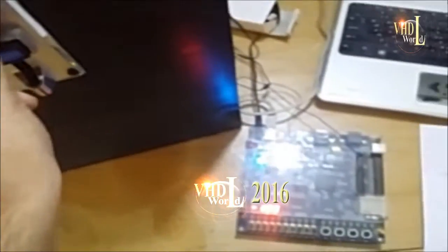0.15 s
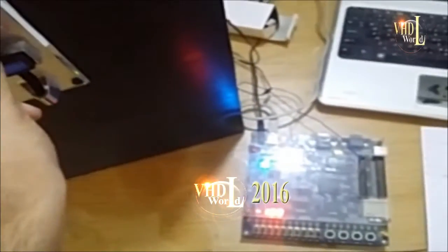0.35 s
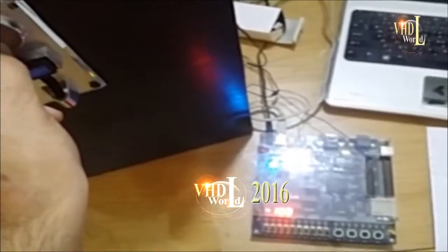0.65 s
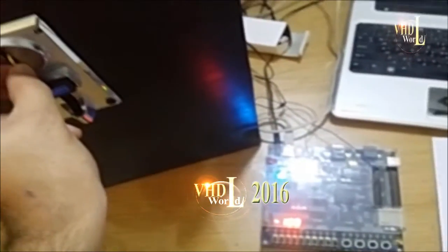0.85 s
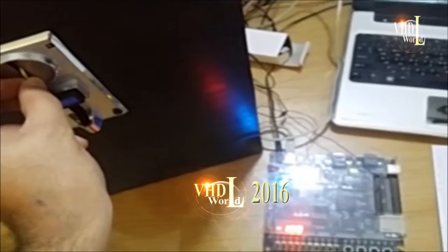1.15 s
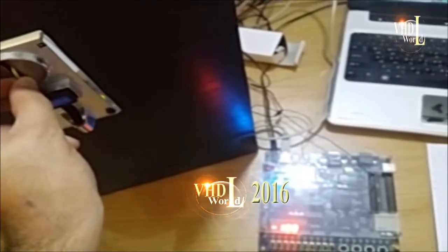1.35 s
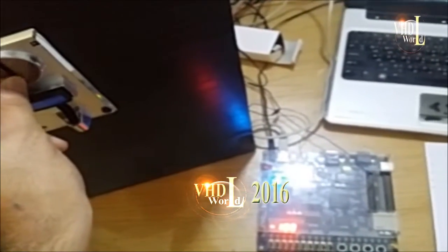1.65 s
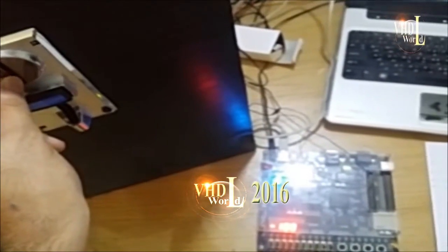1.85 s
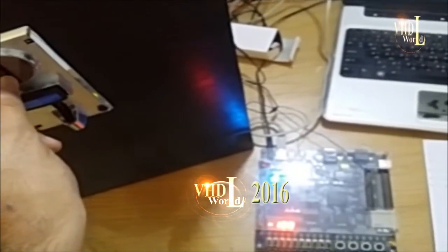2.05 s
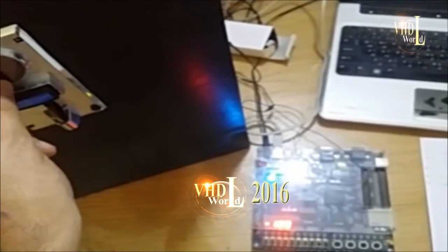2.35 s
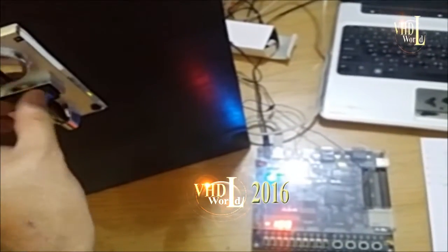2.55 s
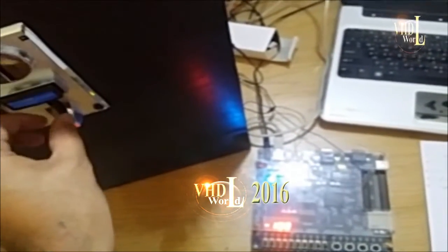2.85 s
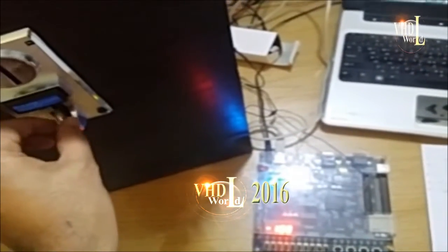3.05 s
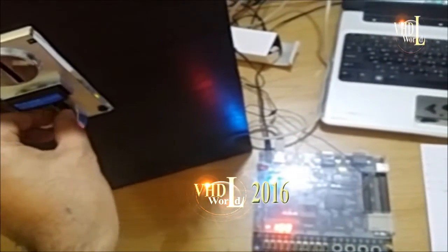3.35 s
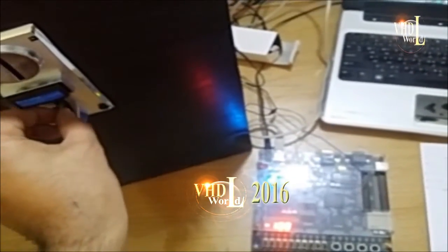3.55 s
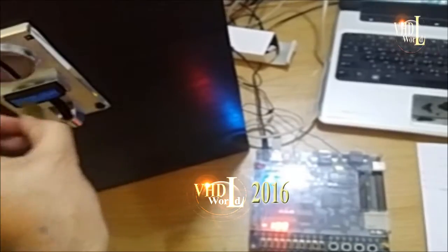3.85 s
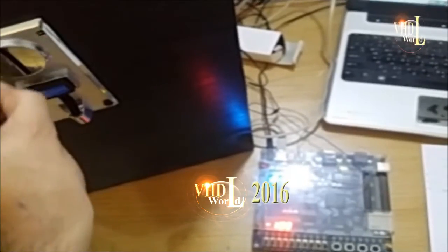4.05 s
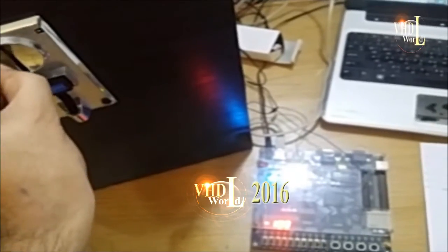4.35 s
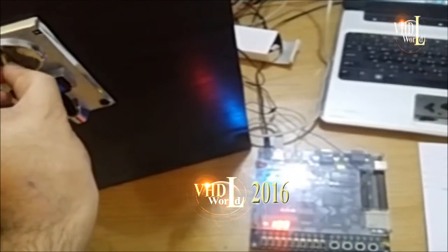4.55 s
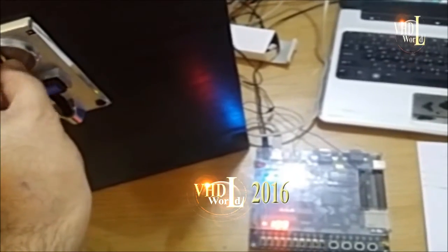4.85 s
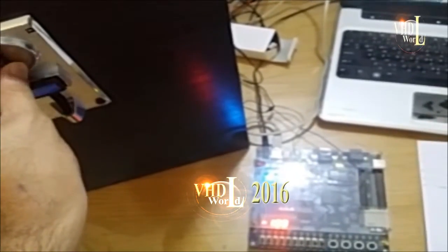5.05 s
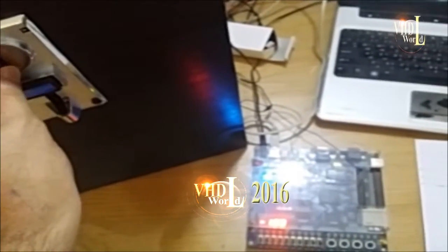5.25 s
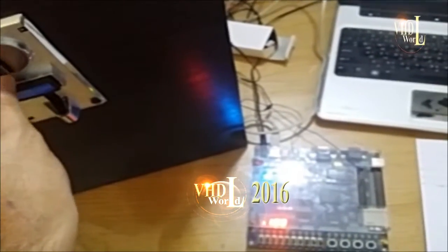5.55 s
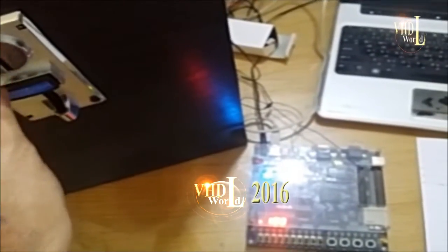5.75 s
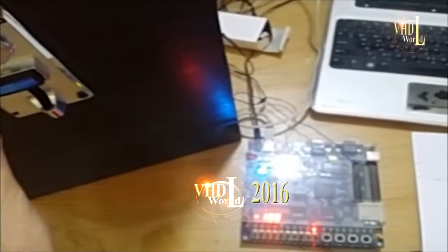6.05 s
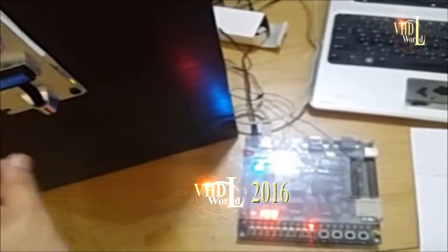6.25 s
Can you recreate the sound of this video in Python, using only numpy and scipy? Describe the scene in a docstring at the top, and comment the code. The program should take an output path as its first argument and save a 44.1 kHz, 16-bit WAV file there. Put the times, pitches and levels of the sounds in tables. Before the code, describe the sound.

A coin scrapes into a metal slot, clatters down to a return tray, is picked out, then reinserted and tumbles through a hollow box.

```python
"""A coin is pushed twice into a coin acceptor mounted in a box on a desk, close to a two-port microphone.
First it scrapes through the slot, drops to the return tray and is fished out; then it falls on through the box.
Each touch sums a noise crack, a damped note, decaying modes of the metal, a casing ring and a small room's tail;
slides are trains of such touches. Shaped noise makes the air and fan, wavering sines the electronics' whine,
and a stack of partials with a resonant boom the low drone that swells, holds and fades."""
import sys
import numpy as np
from scipy import signal
from scipy.fft import rfft, irfft, next_fast_len
from scipy.io import wavfile
from scipy.ndimage import uniform_filter1d

SR = 44100
rng = np.random.default_rng(int(sys.argv[2]) if len(sys.argv) > 2 else 0)


def log_audio(samples):
    """Write samples as a 16-bit WAV file to the path given in sys.argv[1]."""
    # one column per channel
    frames = np.atleast_2d(samples).T
    # limit to full scale, then quantise
    limited = np.clip(frames, -1, 1)
    pcm = np.round(limited * 32767).astype(np.int16)
    wavfile.write(sys.argv[1], SR, pcm)


N = 282194
RING_SIZE = SR // 2  # half a second of samples for each ring

# Edges of the four registers thump, box, clink and tick [Hz].
REGISTERS = [90, 450, 1800, 6500, 16000]
# Modes of the acceptor and its face plate. Each row: frequency in Hz, relative strength in dB, t60 in s.
SLOT_MODES = [(112.2, -8, 0.52), (155.5, -8, .4), (264.8, 1, 0.19), (293, 3.5, 0.14), (690, -8, 0.2),
              (781, -7, 0.052), (792.6, 0.5, 0.16), (1326, -11, 0.26), (1317, -7.5, 0.112),
              (1412, -6.5, 0.14), (1975, -4.5, 0.052), (2227, 3, 0.13), (2290, -7, 0.064),
              (2520, -11, 0.18), (3020, -1.5, 0.097), (3073, 3, 0.087), (3380, 5.5, 0.13),
              (3926, -28, 0.54), (4720, -3, 0.16), (5300, -12.5, 0.072)]
# Modes of the box floor. Each row: frequency in Hz, relative strength in dB, t60 in s.
BOX_MODES = [(124.4, -14, 0.96), (147.7, -11.5, .6), (268, 4.5, 0.038), (780, 8.5, 0.027), (765, -4, 0.26),
             (814, -7, 0.19), (1065, 2.5, 0.033), (1308, 4.5, 0.14), (1370, 2, 0.14), (1432, -4, 0.27),
             (1514, -14, 0.34), (1680, -7, 0.28), (2523, -1.5, 0.31), (2670, -7, .16), (2650, -7, 0.19),
             (4390, -1.5, .18)]
# Modes of the metal the coin tumbles over in the box. Each row: frequency in Hz, relative strength in dB, t60 in s.
TUMBLE_MODES = [(156, -13, 0.18), (288, -11.5, 0.22), (406, -8.5, 0.089), (562, -5, 0.052),
                (696, -2, 0.089), (1040, -5, 0.17), (2620, -1, 0.34), (3650, 9.5, 0.3), (3743, 9, 0.074),
                (4080, 7.5, 0.23), (4210, 1, 0.11), (5070, -0.5, 0.13), (5300, -23, 0.099)]
# What the coin can touch. Each name: modes, thump over clink in dB, crack share in dB before a common trim,
# ring share in dB before a common trim (knocks only), left minus right in dB (knocks only),
# tick over clink of a slide in dB.
SURFACES = {"slot": (SLOT_MODES, -9.5, 2, 3, -1, -13.5), "gate": (SLOT_MODES, -3.5, 0.5, -0.92, -1.1, -15),
            "chute": (SLOT_MODES, -12, 5.8, 11, 0, -19.5), "runway": (SLOT_MODES, -9.5, 0, -2.3, 0.93, -15),
            "tray": (SLOT_MODES, -11, 8.1, -1, -1, -22), "floor": (BOX_MODES, -10, 3.2, 3.8, -0.8, -15),
            "tumble": (TUMBLE_MODES, -8, 6.7, 6.7, -2.2, -4),
            "catch": (SLOT_MODES, -15.5, 6.6, -2.3, -0.6, -15)}


def undb(db):
    """Decibels to gain."""
    return 10 ** (np.asarray(db) / 20)


def on_log(hz, points):
    """Read (Hz, value) points on a log-frequency axis."""
    point_hz, value = np.transpose(points)
    return np.interp(np.log(np.maximum(hz, 1)), np.log(point_hz), value)


def unit(x):
    """Scale to a mean energy of one per channel."""
    return x / np.sqrt(np.mean(np.sum(x ** 2, axis=-1)))


def band(x, lo_hz, hi_hz):
    """Causal band-pass."""
    return signal.sosfilt(signal.butter(3, [lo_hz, hi_hz], "band", fs=SR, output="sos"), x)


def fade(t, t60):
    """Exponential decay, 60 dB down after t60 seconds."""
    return np.exp(-np.log(1000) * t / t60)


def through(x, response):
    """Convolve along time."""
    size = x.shape[-1] + response.shape[-1]
    fft_size = next_fast_len(size)
    return irfft(rfft(x, fft_size) * rfft(response, fft_size), fft_size)[..., :size]


def tint(x, points, size=4096):
    """Causal minimum-phase filter through (Hz, dB) points, from the folded cepstrum."""
    gain = undb(on_log(np.fft.rfftfreq(size, 1 / SR), points))
    cepstrum = irfft(np.log(gain))
    cepstrum[1:size // 2] *= 2
    cepstrum[size // 2 + 1:] = 0
    response = irfft(np.exp(rfft(cepstrum)))
    return through(x, response)[..., :x.shape[-1]]


def add(out, s, sound):
    """Mix a sound in at time s."""
    start = int(s * SR)
    out[:, start:start + sound.shape[-1]] += sound[:, :N - start]


def walk(rate):
    """Slow random drift around zero: held draws, rate per second, smoothed twice."""
    hold = int(SR / rate)
    steps = np.repeat(rng.standard_normal(N // hold + 1), hold)
    smooth = uniform_filter1d(uniform_filter1d(steps, hold), hold)
    return 1.3 * smooth[:N]  # brings the spread back near one


def diffuse(size, apart_hz=1300):
    """Noise from all sides at two ports: alike in the bass, unrelated in the treble."""
    mid, side = rfft(rng.standard_normal((2, size)))
    alike = .98 * np.sinc(np.fft.rfftfreq(size, 1 / SR) / apart_hz)
    left_right = np.array([[1], [-1]])
    return irfft(mid * np.sqrt(1 + alike) + side * np.sqrt(1 - alike) * left_right, size)


def background(whine_waver=0.00284):
    """Soft air and fan noise under the wavering tones of the electronics."""
    # Room air and cooling fan. Each row: frequency in Hz, relative density in dB per Hz.
    air_colour = [(20,-8), (38,0), (70,-4), (150,-10), (300,-10), (500,-14.5), (900,-18.5), (1700,-18),
                  (2700,-23), (4400,-17), (6000,-24.5), (8000,-31.5), (15000,-36)]
    # Strength of that air. Each row: time in seconds, level in dB.
    air_strength = [(0, -59), (1, -55.5), (2.6, -54), (3.201, -58), (4.1, -60.5), (4.6, -56), (6.4, -59)]
    # Steady tones of the electronics. Each row: mean frequency in Hz, RMS level in dB.
    whine_tones = [(59.5, -87), (285, -71.5), (1163, -74), (1701, -78.5)]
    air_db = np.interp(np.arange(N) / SR, *np.transpose(air_strength)) + .4 * walk(5)
    air = unit(tint(diffuse(N), air_colour)) * np.sqrt(N) * undb(air_db)
    tones = 0
    for hz, db in whine_tones:
        phase = 2 * np.pi * np.cumsum(hz * (1 + whine_waver * walk(29.51))) / SR
        tones = tones + undb(db) * np.sin(phase)
    return air + np.sqrt(2) * tones  # sine amplitude from RMS


def drone(waver=0.0073, flutter_db=1.5):
    """A low drone, like an engine beyond the wall; partials near a room resonance boom."""
    # The drone's partials. Each row: multiple of the cycle rate, level against the drone in dB.
    partials = [(1, -8.5), (2, -41.5), (3, -3.5), (4, -12.5), (5, -19.5)]
    start_hz, climb_hz_per_s, top_hz = 31.34, 2.55, 36.4
    level_top_db, hold_from_s, hold_to_s = -51, 0.96, 2.746
    swell_db_per_s, drop_db, drop_s, fade_db_per_s = 36, 15.5, 0.26, 4
    resonance_hz, resonance_width_hz = 298.3, 10.1
    boom_over_drone_db, boom_fall_db_per_hz = 6.5, 2.6
    t = np.arange(N) / SR
    # the cycle rate climbs evenly to a steady speed
    hz = np.minimum(start_hz + climb_hz_per_s * t, top_hz)
    phase = 2 * np.pi * np.cumsum(hz * (1 + waver * walk(24.93))) / SR
    # it swells, holds under load, then drops and dies away
    early, late = np.maximum(hold_from_s - t, 0), np.maximum(t - hold_to_s, 0)
    drop = drop_db * np.minimum(late / drop_s, 1)
    level_db = level_top_db - swell_db_per_s * early - drop - fade_db_per_s * late
    low = sum(undb(level_db + db + flutter_db * walk(26.86)) * np.sin(round(k) * phase) for k, db in partials)
    # the boom's share shrinks as the drone speeds up
    boom_db = level_db + boom_over_drone_db - boom_fall_db_per_hz * (hz - start_hz)
    boom = 0
    for k in range(7, 12):
        detuning = 2 * (k * hz - resonance_hz) / resonance_width_hz
        boom = boom + np.sin(k * phase) / np.hypot(1, detuning)
    return np.sqrt(2) * (low + undb(boom_db + flutter_db * walk(12)) * boom)


def room(build_s=0.0047):
    """The small room's tail: it builds up quickly and the treble dies first."""
    # Decay of the room. Each row: frequency in Hz, t60 in s.
    room_decay = [(100, 0.9), (500, 0.37), (3000, 0.32), (14000, 0.21)]
    t, noise = np.arange(RING_SIZE) / SR, diffuse(RING_SIZE)
    edges = np.geomspace(60, 17000, 8)
    tail = 0
    for lo, hi in zip(edges, edges[1:]):
        t60 = on_log(np.sqrt(lo * hi), room_decay)
        tail = tail + band(noise, lo, hi) * fade(t, t60)
    return unit(tail * (1 - np.exp(-t / build_s)))


def vibrations(table):
    """Frequencies and decaying waves of an object's modes, at equal energy before their strengths."""
    t = np.arange(RING_SIZE) / SR
    hz, db, t60 = np.transpose(table)[..., None]
    waves = undb(db) * np.exp(2j * np.pi * hz * t) * fade(t, t60) / np.sqrt(t60)
    return hz[:, 0], waves


def ring(modes, scatter_db=4.0, apart_hz=2500):
    """Every point of impact drives the modes with other strengths; high modes reach the ports out of step."""
    hz, waves = modes
    size, turn, skew = rng.standard_normal((len(hz), 3)).T
    skew = skew * np.minimum(hz / apart_hz, 1) * np.array([[1], [-1]])
    drive = undb(scatter_db * size) * np.exp(1j * (np.pi * turn + skew))
    return unit(np.imag(drive @ waves))


def contact(modes, pitch_hz, crack_db, ring_db, press_s=0.00038, crack_t60=0.025, pitch_t60=0.038,
            casing_t60=0.12, lag_s=0.00022, damping_db=6):
    """One touch of the coin: a crack, a damped note, the casing's dense ring, the clear modes and the room."""
    # Broad colour of a contact. Each row: frequency in Hz, relative density in dB per Hz.
    contact_colour = [(110, -3.5), (280, -2), (450, -1), (800, 5), (1400, 5), (1900, 8), (2500, 11.5),
                      (3200, 14.5), (4300, 13), (5500, 4), (7000, -11), (9000, -14.5), (12000, -13),
                      (15000, -17)]
    t = np.arange(RING_SIZE) / SR
    crack = unit(rng.standard_normal(RING_SIZE) * fade(t, crack_t60))
    note = unit(np.sin(2 * np.pi * pitch_hz * t) * fade(t, pitch_t60))
    direct = tint(crack, contact_colour) + undb(5.5) * note
    # the direct sound reaches the left port a moment later
    direct = np.array([np.interp(t - lag_s, t, direct, left=0), direct])
    # casing and walls soak up the highest treble
    casing = unit(diffuse(RING_SIZE) * fade(t, casing_t60))
    damped = [(hz, db - damping_db * np.tanh((hz / REGISTERS[3]) ** 2)) for hz, db in contact_colour]
    spread = tint(undb(6.5) * casing + undb(1.0) * room(), damped)
    sound = undb(crack_db - 2.5) * direct + spread + undb(ring_db + 6.0) * ring(modes)
    return sound * (1 - np.exp(-t / press_s))  # a longer press softens the onset


def weigh(sound, levels_db, seconds):
    """Give each register its strength over the first seconds: hard corners tick, flat blows thump."""
    out = 0
    for lo, hi, db in zip(REGISTERS, REGISTERS[1:], levels_db):
        part = band(sound, lo, hi)
        rms = np.sqrt(np.mean(part[:, :int(seconds * SR)] ** 2))
        out = out + part * undb(db) / rms
    return out


def register_levels(level_db, thump_db, weight_db, hardness_db):
    """Levels of thump, box, clink and tick in dB: a heavier contact also thumps more."""
    thump_per_weight = 0.59  # dB per dB of weight
    return level_db + np.array([thump_db + thump_per_weight * weight_db, weight_db, 0, hardness_db])


def surface_at(s):
    """The name of the surface that the coin has reached at time s."""
    # The coin's route. First the gate turns it down the return chute to the tray; the second time it takes
    # the runway, falls on the box floor, tumbles and meets a small metal catch.
    # Each row: start in seconds, surface name.
    route = [(0, "slot"), (1.85, "gate"), (1.9, "chute"), (2.2, "tray"), (4.4, "slot"), (5.3, "runway"),
             (5.5, "floor"), (5.7, "tumble"), (6.0, "catch")]
    return [name for start, name in route if start <= s][-1]


def slides(parts, slide_db=-3.5, slips_per_s=520, slip_scatter_db=5.0, edge_s=0.0048, rumble_db=5):
    """The rim catches and slips many times while its pressure swells or eases; it rumbles more than a knock."""
    # The coin sliding or rattling along metal. Each row: start in seconds, end in seconds, clink level in dB
    # before a common trim, contact pitch in Hz, weight (box over clink) in dB, swell by the end in dB.
    slide_list = [(1.68,1.777,-44.5,2230,1,-2), (1.765,1.876,-46,2230,4,-14),
                  (2.009,2.065,-32,3400,-5.5,10), (2.112,2.189,-34,2270,1.5,-2.5),
                  (3.74,3.798,-42,2400,-5.5,10), (3.796,3.82,-37,3150,-5.5,-1),
                  (4.469,4.638,-51,3450,-7.5,-7), (4.711,4.77,-53.5,2390,-0.5,-2),
                  (4.78,4.901,-56,2260,1,-1), (4.99,5.052,-52,1460,4.5,4), (5.14,5.32,-46,1434,3,0.5),
                  (5.594,5.66,-37.5,1520,1.5,-19), (5.745,5.883,-31.5,3690,-3,-10.5),
                  (5.876,5.948,-51,765,7.5,10)]
    out, t = np.zeros((2, N)), np.arange(RING_SIZE) / SR
    for start, end, level_db, pitch_hz, weight_db, swell_db in slide_list:
        name = surface_at(start)
        _, thump_db, crack_db, _, _, hardness_db = SURFACES[name]
        when, size = rng.random(RING_SIZE), rng.standard_normal(RING_SIZE)
        held = np.clip(np.minimum(t + edge_s / 2, end - start - t) / edge_s, 0, 1)
        pressure = held * undb(swell_db * np.minimum(t / (end - start), 1))
        kicks = np.sign(size) * undb(slip_scatter_db * np.abs(size))
        slips = (when < slips_per_s / SR) * kicks * pressure
        scrape = through(slips, contact(parts[name], pitch_hz, crack_db, ring_db=0.0))
        levels_db = register_levels(level_db, thump_db + rumble_db, weight_db, hardness_db)
        left_right_db = np.array([[1.5], [0]])
        add(out, start, weigh(scrape, levels_db, end - start) * undb(slide_db + left_right_db))
    return out


def knocks(parts, knock_db=-0.46, press_s=0.0006, softening=0.25):
    """Each knock rings the part that the coin has reached; a soft one, with little tick, presses for longer."""
    # The coin's knocks. Each row: start in seconds, clink level in dB before a common trim, contact pitch in Hz,
    # weight (box over clink) in dB, hardness (tick over clink) in dB.
    knock_list = [(1.587,-52.5,2390,0.5,-14), (1.632,-32.5,2180,2,-12), (1.876,-17,3340,-7.5,-5.5),
                  (1.936,-23,4050,-9.5,-5.5), (2.053,-29.5,2570,-3,-17), (2.087,-26,2820,-7,-20),
                  (2.109,-29.5,2210,-9.5,-23), (2.2315,-18,3020,-25,-7.5), (2.234,-16,3350,-18.5,-14.5),
                  (2.3132,-29,4100,-10,-8.5), (2.3337,-24.5,3114,-15,-21.5), (2.622,-53.5,2960,4.5,-11),
                  (3.187,-59,3270,-15.5,-20), (3.293,-38.5,3200,-12,-16), (3.3005,-33,3110,-12,-19),
                  (3.351,-50,4500,-2.5,-14.5), (3.395,-43.5,3510,-7,-12), (3.812,-43.5,2220,3.5,-20),
                  (4.2324,-32,4310,-10,-8.5), (4.465,-45.5,4240,-8,-14.5), (5.102,-43.5,3080,5,-12),
                  (5.119,-39.5,3530,0.5,-15), (5.317,-35,2550,-7,-13), (5.354,-27,2710,-12,-11),
                  (5.373,-20.5,2710,-9.5,-8.5), (5.413,-24,2660,-17,-8), (5.43,-35,3300,-1.5,-4),
                  (5.5291,-15.5,2820,-1,-12.5), (5.54,-19,4280,-1.5,-23), (5.549,-26.5,1370,2,-21),
                  (5.585,-25.5,1780,6.5,-27), (5.725,-20.5,3740,-11,-1), (5.737,-19.5,3660,-10,-2),
                  (5.78,-19,4030,-9.5,-7.5), (5.812,-19.5,3740,-13,-6), (5.844,-25.5,2590,-8,-11),
                  (5.907,-42.5,2530,4,-13), (5.942,-37.5,2770,-10,-15), (6.008,-39,2790,-5.5,-9),
                  (6.028,-21,3200,-13.5,0), (6.036,-24.5,3320,-10.5,-18)]
    out = np.zeros((2, N))
    for s, level_db, pitch_hz, weight_db, hardness_db in knock_list:
        name = surface_at(s)
        _, thump_db, crack_db, ring_db, pan_db, _ = SURFACES[name]
        soft_press_s = press_s * undb(-softening * hardness_db)
        knock = contact(parts[name], pitch_hz, crack_db, ring_db, soft_press_s)
        levels_db = register_levels(level_db, thump_db, weight_db, hardness_db)
        left_right_db = np.array([[pan_db], [0]])
        add(out, s, weigh(knock, levels_db, .018) * undb(knock_db + left_right_db))
    return out


def coin():
    """The coin's way through slot and box: knocks and slides ring the modes of what it touches."""
    parts = {name: vibrations(surface[0]) for name, surface in SURFACES.items()}
    return knocks(parts) + slides(parts)


def scene():
    """The coin over the drone and the quiet of the room."""
    return coin() + drone() + background()


def record(dry):
    """Two microphone ports: the left is duller around 4 kHz, and the top of both is cut."""
    # The left port's response against the right. Each row: frequency in Hz, gain in dB.
    left_response = [(100, 1.37), (350, 1.7), (700, 2), (1300, 2.5), (2300, 2), (3200, -5), (4300, -16),
                     (6000, -13.5), (8000, -6.5), (12000, -2.5), (15000, -2)]
    top_hz = 15900
    ports = np.array([tint(dry[0], left_response), dry[1]])
    return signal.sosfilt(signal.ellip(8, .2, 70, top_hz, fs=SR, output="sos"), ports)


dry = scene()
out = record(dry)
log_audio(out)
```